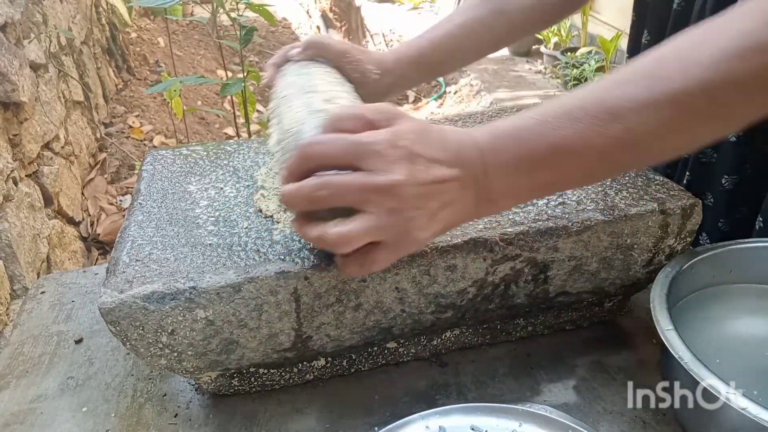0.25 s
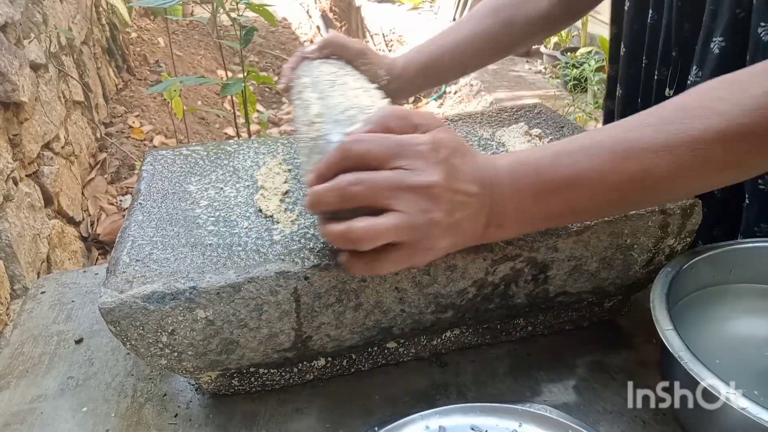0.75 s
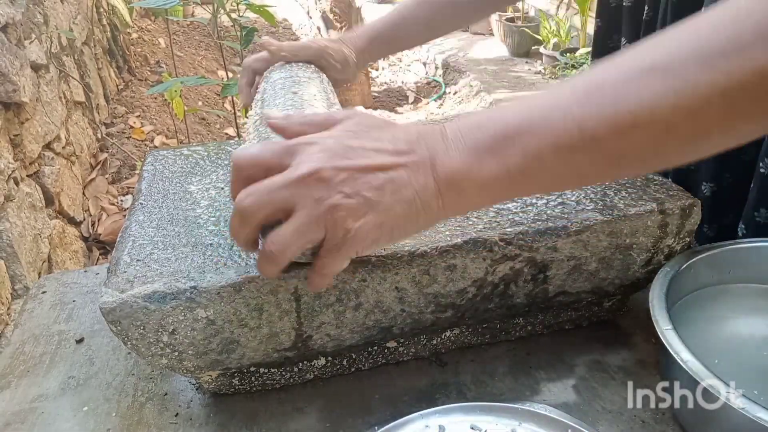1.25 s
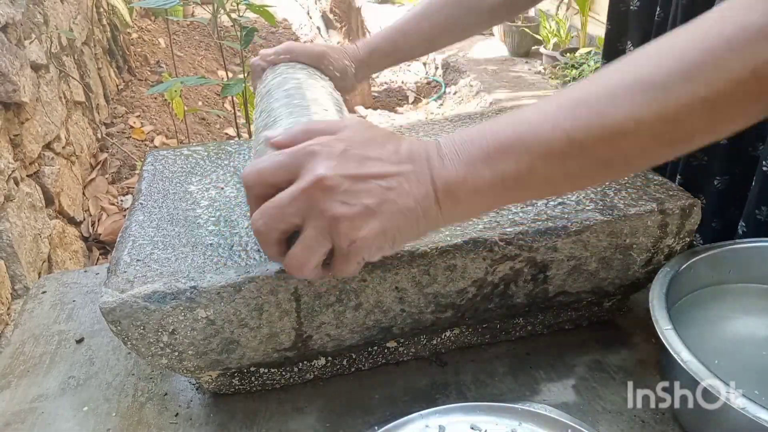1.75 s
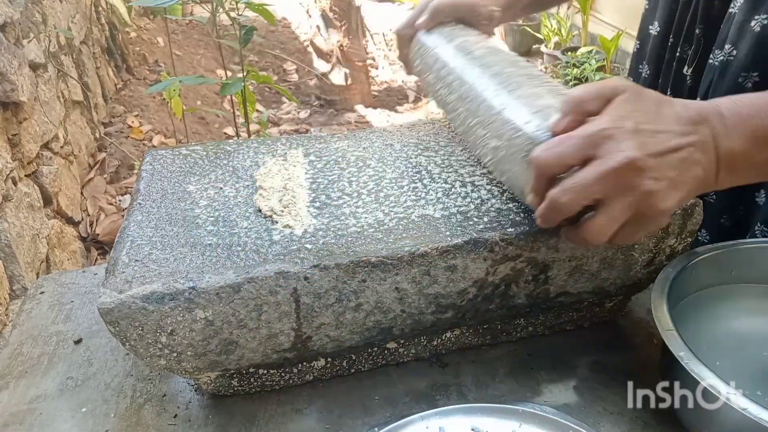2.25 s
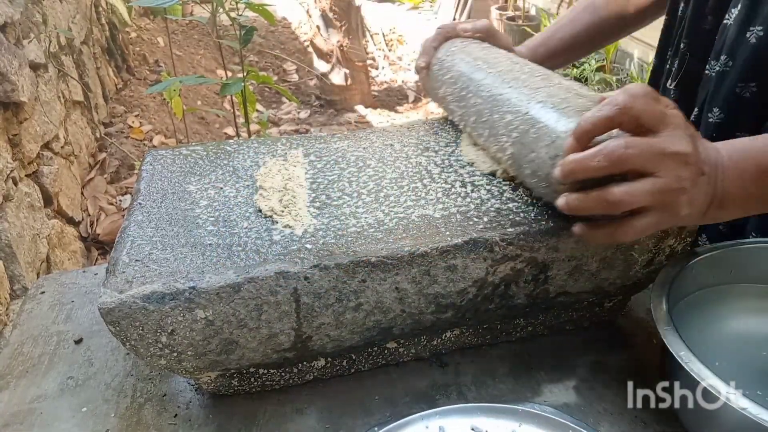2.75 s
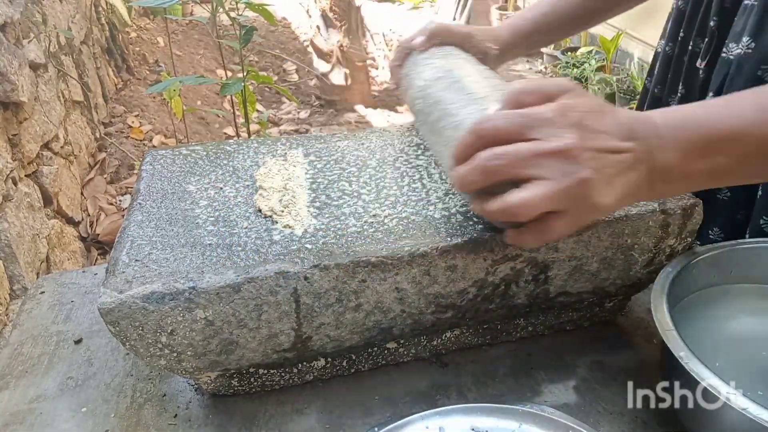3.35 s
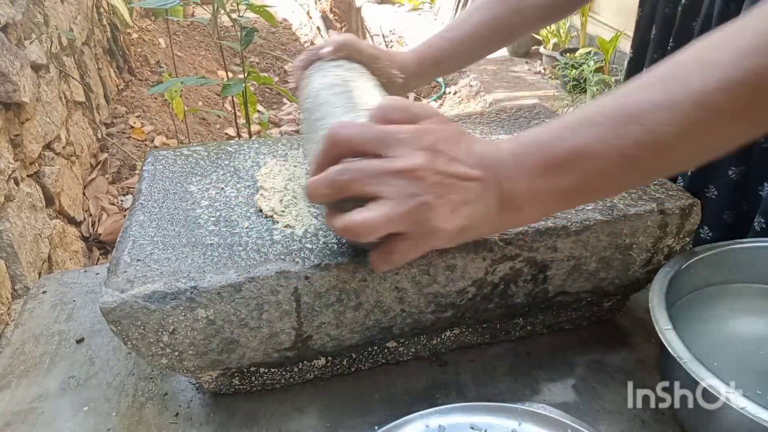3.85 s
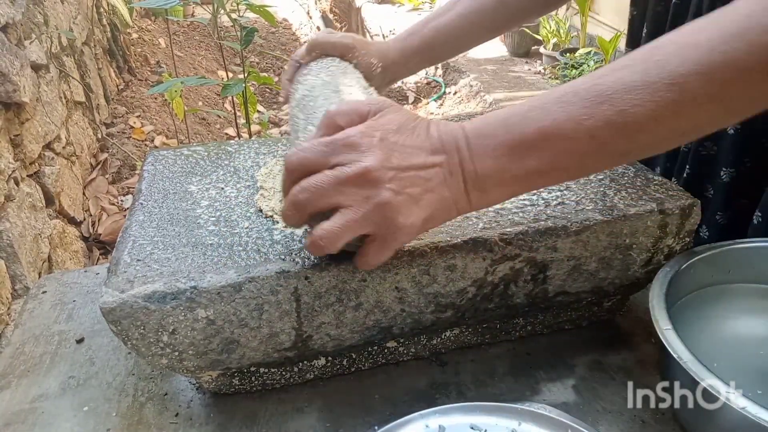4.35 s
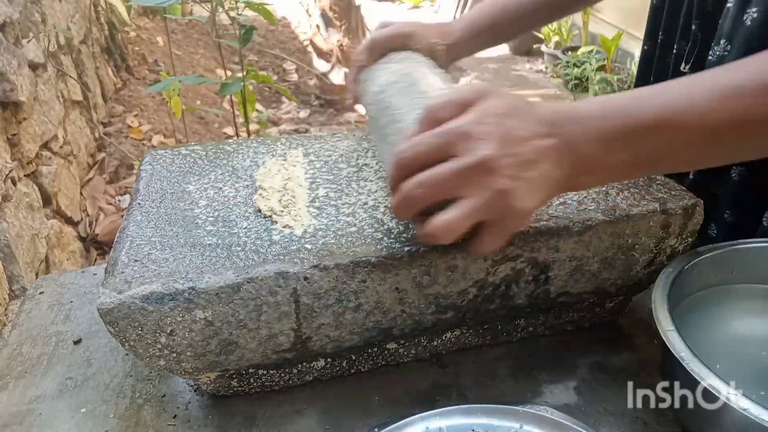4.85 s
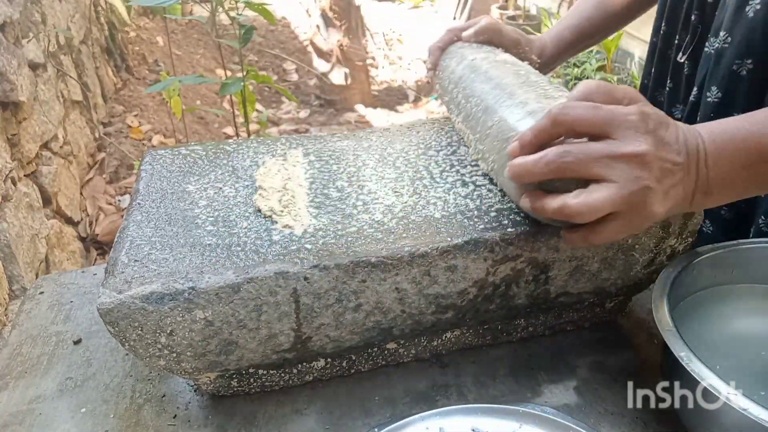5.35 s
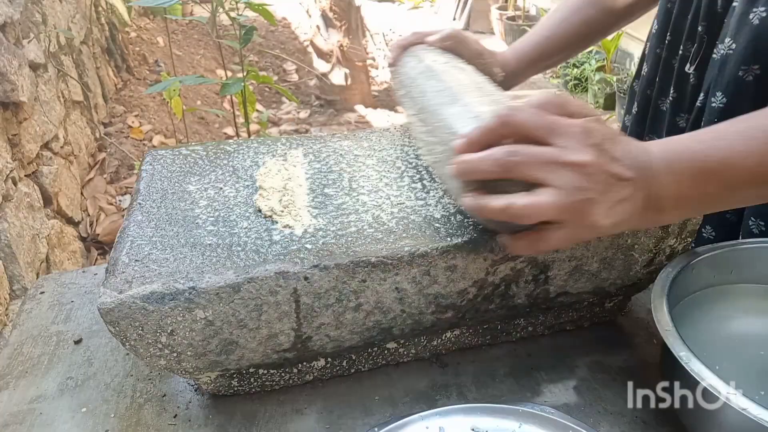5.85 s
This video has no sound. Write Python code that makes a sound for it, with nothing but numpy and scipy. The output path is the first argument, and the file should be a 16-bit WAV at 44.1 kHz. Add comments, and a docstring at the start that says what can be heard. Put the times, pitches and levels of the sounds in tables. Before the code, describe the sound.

Close by, stone grates on stone as a roller crushes paste on a slab in forceful, regular strokes, with a fine gritty crunch. Partway through, the roller clatters against the slab in several sharper knocks, then the grinding carries on. Behind it is a quiet outdoor wash of air, leaves and far traffic, with hoarse distant crows and high bird whistles that come more often in the second half.

```python
"""Gritty, thumping rumble of a granite roller pushed to and fro over a pitted slab, close by in a yard.
Every pit it rides over thumps the slab and rings the roller; grit and paste crackle, and now and then
stone knocks on stone. Far off among trees, small birds whistle in gliding tones and crows caw,
rough pulses through a resonant throat, over a low wash of air, leaves and traffic."""
import sys
import numpy as np
from scipy import signal
from scipy.fft import rfft, irfft, next_fast_len
from scipy.io import wavfile
from scipy.ndimage import map_coordinates

SR = 44100
rng = np.random.default_rng(int(sys.argv[2]) if len(sys.argv) > 2 else 0)


def log_audio(samples):
    """Write samples as a 16-bit WAV file to the path given in sys.argv[1]."""
    # one column per channel
    frames = np.atleast_2d(samples).T
    # limit to full scale, then quantise
    limited = np.clip(frames, -1, 1)
    pcm = np.round(limited * 32767).astype(np.int16)
    wavfile.write(sys.argv[1], SR, pcm)


N = 269010

# body of the slab: f/Hz, width/Hz, level/dB
SLAB_MODES = [(420, 81.3, 12.5), (545, 43, -8.5), (729.8, 29.4, -2), (958, 32, -3.5)]
# low end, the slab on its bed: f/Hz, width/Hz, level/dB
BED_MODES = [(103.8, 7.6, -12.5), (157.3, 52, -12.5), (262, 51.6, 5.5), (291.8, 68.3, 1.5)]
# bending ring of the roller: f/Hz, width/Hz, level/dB
ROLLER_MODES = [(2905, 4.4, -9.5), (2900, 11, 2.5), (3160, 450, -12.5), (3406, 33, 7)]
# its twin, the same bend across the other diameter: f/Hz, width/Hz, level/dB
TWIN_MODES = [(3595, 38, 0)]
# tone colour of the gritty crackle, with a bright microphone resonance near 9.4 kHz: f/Hz, level/dB
CRACKLE_EQ = [(1000, -14), (2000, -15.5), (2900, -8.5), (4000, -9), (5000, -21), (7000, -18), (8200, -14.5),
              (9400, -6), (11000, -17), (12500, -21.5), (15700, -24.5)]


def amp(db):
    """Gain of a level in dB."""
    return 10 ** (np.asarray(db) / 20)


def unit(x):
    """x at rms 1."""
    return x / np.sqrt(np.mean(x ** 2) + 1e-20)


def wobble(rate):
    """A smooth random curve, rate knots a second."""
    knots = rng.standard_normal(int(N * rate / SR) + 4)
    return map_coordinates(knots, [np.arange(N) * rate / SR])


def filtered(x, response):
    """x times a complex response of frequency."""
    size = next_fast_len(N + SR // 2)
    return irfft(rfft(x, size) * response(np.fft.rfftfreq(size, 1 / SR)), size)[..., :N]


def coloured(x, points):
    """x through an EQ curve of (f/Hz, level/dB) points on a log axis."""
    f, db = np.transpose(points)
    return filtered(x, lambda hz: amp(np.interp(np.log(hz + 1), np.log(f + 1), db)))


def ringing(x, modes, soft_hz):
    """x through resonances; a soft contact carries nothing much above soft_hz."""
    def response(f):
        body = sum((-1) ** k * amp(db) * 1j * f * width / (hz * hz - f * f + 1j * f * width)
                   for k, (hz, width, db) in enumerate(modes))
        return body / (1 + 1.4j * f / soft_hz - (f / soft_hz) ** 2) ** 2
    return filtered(x, response)


def bumps(rate, spread_db):
    """Random contacts, rate a second, most small and a few large."""
    chance, size, sign = rng.random((3, N))
    strength = amp(-spread_db * np.log(size + 0.0048))
    return unit((chance < rate / SR) * strength * np.sign(sign - .5))


def swells(start, rise, fall, db, swing=1, cut_db_per_s=575, rise_power=2.66, fall_power=1.88):
    """Envelope of events that swell, sag and cut off; swing scales the depth, powers square the shape."""
    t = np.arange(0, N / SR + .001, .001)
    start, rise, fall, db = (np.reshape(column, (-1, 1)) for column in (start, rise, fall, db))
    rise, fall = np.maximum(rise, .005), np.maximum(fall, .005)
    past_peak = t - start - rise
    sag = np.where(past_peak < 0, np.abs(past_peak / rise) ** rise_power,
                   np.abs(past_peak / fall) ** fall_power)
    outside_s = np.maximum(np.maximum(-past_peak - rise, past_peak - fall), 0)
    drop_db = swing * 19.5 * np.minimum(sag, 1) + cut_db_per_s * outside_s
    gain = np.sqrt(np.sum(amp(db - drop_db) ** 2, axis=0))
    return np.interp(np.arange(N) / SR, t, gain)


def yard():
    """Air, leaves and far traffic: a low, gently drifting wash of noise."""
    # tone colour of the ambience: f/Hz, level/dB
    spectrum = [(25, -10), (60, 6.5), (144, 11), (283, -3.5), (485, -8.5), (700, -1.5), (1030, -6.5),
                (2720, -3.5), (3470, -8.5), (4920, -16.5), (7580, -26.5), (9400, -46), (12500, -44.5),
                (16500, -62.5)]
    return unit(coloured(rng.standard_normal(N), spectrum)) * amp(-60 + 0.65 * wobble(1.7))


def whistle(call, rough_hz, octave_db):
    """One bird call: a gliding sine with a weak octave, the pitch shaken by rough_hz."""
    start, rise, fall, db, first_hz, last_hz = call
    hz = np.interp(np.arange(N) / SR, [start, start + rise + fall], [first_hz, last_hz])
    phase = 2 * np.pi * np.cumsum(hz + rough_hz * wobble(250)) / SR
    envelope = swells(start, rise, fall, db, swing=0.74, cut_db_per_s=900)
    flutter = amp(wobble(60))
    return np.sqrt(2) * envelope * flutter * (np.sin(phase) + amp(octave_db) * np.sin(2 * phase))


def birds():
    """Whistles, a wheeze and crows, set far back by the reverb of the trees."""
    # clear calls: start/s, rise/s, fall/s, level/dB before the reverb mix, first f/Hz, last f/Hz
    whistles = [(2.96, 0.17, 0.18, -57, 5010, 5020), (3.225, 0.059, 0.085, -48.5, 5255, 4900),
                (3.59, 0.024, 0.032, -50, 4400, 4890), (3.64, 0.015, .05, -44, 4790, 4830),
                (3.755, 0.019, 0.07, -50, 5110, 4900), (4.1, 0.036, 0.055, -47.5, 5160, 5130),
                (4.182, 0.12, .05, -49.5, 5100, 4840), (4.36, 0.046, 0.18, -59, 4880, 5080),
                (4.41, 0.026, 0.042, -48, 5100, 5100), (4.525, 0.027, .05, -51.5, 5254, 5290),
                (4.865, 0.025, 0.043, -49.5, 5040, 5030), (-.02, 0.017, .07, -54.5, 1783, 1350),
                (1.69, 0.035, 0.09, -56.5, 1348, 1390), (1.71, .03, 0.34, -61.5, 1143, 1123),
                (2.081, 0.25, 0.22, -61, 2010, 1633), (4.79, .035, 0.046, -58.5, 1390, 1354),
                (4.84, 0.041, .16, -52, 1148, 1142)]
    # one hoarse falling call: same columns
    wheeze = [(.565, .04, 0.26, -47, 4294, 3150)]
    calls = sum(whistle(call, rough_hz=48.1, octave_db=-11.5) for call in whistles)
    calls = calls + whistle(wheeze[0], rough_hz=190, octave_db=-31) + crows()
    t, trees_t60_s = np.arange(SR // 2) / SR, 0.52
    tail = rng.standard_normal(len(t)) * amp(-60 * t / trees_t60_s)
    wet = signal.fftconvolve(calls, tail / np.linalg.norm(tail))[:N]
    return amp(-10) * calls + amp(-1.5) * wet


def grit():
    """Sand and paste crunch in dense tiny cracks, with a sparse crackle of larger grains."""
    # the roller slides over grit: start/s, rise/s, fall/s, level/dB
    slides = [(0.028, 0.14, 0.074, -49.5), (0.334, 0.1, 0.097, -53.0), (0.633, 0.21, 0.083, -51),
              (1.117, 0.089, 0.032, -49), (1.428, 0.13, 0.13, -54.0), (1.784, 0.21, 0.14, -52),
              (2.095, 0.017, 0.26, -68), (2.738, 0.127, 0.14, -51), (3.047, 0.0073, 0.11, -56.5),
              (3.281, 0.11, 0.13, -48.0), (3.617, 0.11, 0.139, -49.0), (3.907, 0.19, 0.083, -50.5),
              (4.233, 0.099, 0.18, -49), (4.537, 0.13, 0.17, -49), (4.849, 0.21, 0.052, -47.5),
              (5.183, 0.096, 0.11, -50.0), (5.46, 0.21, 0.065, -48.5), (5.806, 0.08, 0.17, -49)]
    cracks = bumps(6000, spread_db=2.0)
    crunch = (cracks + .5 * rng.standard_normal(N)) * amp(2.62 * wobble(60))
    crackle = .55 * bumps(120, spread_db=2.5)
    sliding = swells(*np.transpose(slides), swing=0.46, cut_db_per_s=306.5,
                     rise_power=1.17, fall_power=1.17)
    resting = amp(-72)  # paste still crackles faintly between slides
    return unit(coloured(unit(crunch) + crackle, CRACKLE_EQ)) * (resting + sliding)


def grinding():
    """The roller rides over the pits of the slab: one train of bumps shakes slab, bed and roller."""
    # the roller bears down: start/s, rise/s, fall/s, slab level/dB, bed level/dB,
    # roller level/dB, twin level/dB, lag of the twin's peak behind the roller's/s
    strokes = [(0.032, 0.079, 0.13, -26.5, -34, -43, -48.0, -0.055),
               (0.315, 0.031, 0.11, -59, -48, -60.5, -71.5, 0.027),
               (0.387, 0.054, 0.11, -30.0, -30, -51.5, -46, 0.14),
               (0.655, 0.051, 0.26, -26.5, -35.5, -47.5, -46.0, -0.04),
               (0.724, 0.16, 0.045, -29.5, -32.5, -58, -51, 0.009),
               (1.103, 0.077, 0.063, -33.5, -27.0, -45, -39.5, -0.018),
               (1.468, 0.12, 0.059, -32.5, -31.5, -45, -44.5, 0.074),
               (1.922, 0.03, 0.15, -30.0, -31.0, -44, -52, 0.035),
               (2.062, 0.072, 0.073, -42, -36.5, -58.5, -66, -0.116),
               (2.209, 0.034, 0.15, -32.5, -32, -56, -75, -0.036),
               (2.343, 0.027, 0.16, -33.5, -33.5, -52, -58, 0.017),
               (2.586, 0.014, 0.087, -22.5, -23, -43, -57, -0.09),
               (2.611, 0.21, 0.039, -31.5, -40, -56.5, -58, -0.029),
               (2.909, 0.017, 0.16, -29, -35, -58, -63.0, 0.014),
               (3.04, 0.018, 0.12, -37, -40.5, -53.5, -67, -0.12),
               (3.28, 0.068, 0.07, -33, -31, -49.5, -44, -0.041),
               (3.655, 0.13, 0.08, -23.5, -32.0, -46, -43, 0.025),
               (3.973, 0.034, 0.068, -31, -29.5, -46.5, -49, 0.058),
               (4.038, 0.097, 0.052, -33.5, -39.5, -50.5, -54, 0.0048),
               (4.265, 0.14, 0.087, -25, -30, -46.5, -42, 0.043),
               (4.54, 0.12, 0.012, -54.5, -46.0, -56.0, -59, 0.013),
               (4.675, 0.034, 0.093, -33.0, -38.0, -48, -51.5, 0.007),
               (4.884, 0.056, 0.17, -22.5, -30.5, -44, -44.5, -0.075),
               (5.174, 0.018, 0.043, -50, -48, -51.5, -63.5, 0.002),
               (5.256, 0.059, 0.13, -33, -35, -53.5, -54, 0.12),
               (5.499, 0.083, 0.16, -26, -33.0, -47.5, -44.5, 0.089),
               (5.798, 0.012, 0.043, -50, -44, -49, -57, 0.02),
               (5.866, 0.039, 0.17, -34.5, -39, -57, -51, 0.19)]
    start, rise, fall, slab_db, bed_db, roller_db, twin_db, lag = np.transpose(strokes)
    pits = bumps(800, spread_db=2.2) * amp(1.7 * wobble(50))  # the grip judders
    chatter = pits + 0.72 * bumps(1200, spread_db=1.0)
    slab = unit(ringing(pits, SLAB_MODES, soft_hz=885)) * swells(start, rise, fall, slab_db)
    bed = unit(ringing(pits, BED_MODES, soft_hz=551)) * swells(start, rise, fall, bed_db, swing=0.67)

    def bend(modes, db, shift):
        envelope = swells(start, rise + shift, fall - shift, db, swing=0.63, cut_db_per_s=600)
        return unit(ringing(chatter, modes, soft_hz=4400)) * envelope
    # as the roller turns, the contact moves from the one bend to the other
    return slab + bed + bend(ROLLER_MODES, roller_db, -lag / 2) + bend(TWIN_MODES, twin_db, lag / 2)


def pushes(times, levels_db):
    """One spike of force for each touch of the stones."""
    knock_delay_s = 0.001455  # each knock sounds this long after its listed time
    force = np.zeros(N)
    force[np.round((times + knock_delay_s) * SR).astype(int)] = amp(levels_db)
    return force


def blows(times, peaks_db, modes, soft_hz):
    """Each push strikes the modes, which ring with the given peak level."""
    impulse_peak = np.abs(ringing(np.arange(N) == 0, modes, soft_hz)).max()
    return ringing(pushes(times, peaks_db), modes, soft_hz) / impulse_peak


def knocks():
    """Stone on stone: slab, bed and roller ring, and the faces grate as they settle."""
    # hits: t/s, slab peak/dB, then relative to it bed/dB, edge/dB (ahead of its trims), roller/dB
    hits = [(0.04, -23.5, -15, -15, -17), (0.102, -18.5, -17, -21, -32), (0.444, -20, -1.5, -15, -23),
            (0.675, -33, 6, -33, -26), (0.76, -26, 6.5, -19, -32), (1.575, -21.5, 4.5, -8, -22),
            (1.939, -26.5, -14, -3, -25), (2.239, -19.5, -9, -21, -25), (2.289, -23.5, -29, -21, -20),
            (2.367, -19, -8, -22, -13.5), (2.491, -21, 2, -17, -49), (2.586, -21, 4, -16, -26),
            (2.596, -5, -2.5, -8, -16.5), (2.607, -11.5, -28, -19, -30), (2.635, -4, -41, -7.5, -23.5),
            (2.665, -12.5, -5, -14, -38), (2.678, -13.5, -14, -19, -50), (2.732, -13, -30, -15, -44),
            (2.79, -27, -2, -30, -35), (2.918, -25, 1.5, -21, -23), (3.056, -9, -7, -11.5, -15.5),
            (3.096, -14.5, -4.5, -13, -15), (3.133, -34, 9, -11, -8), (3.813, -17, -6, -17, -34),
            (3.987, -34, 5.5, -8, 5), (4.344, -16.5, -8, -21, -31), (4.623, -38.5, 5.5, -20, -25),
            (4.917, -23, -4.5, -26, -38), (5.178, -40.5, 11, -25, -22), (5.271, -25.5, 5, -20, -5),
            (5.369, -16, -20.5, -9.5, -23), (5.802, -41, 7.5, -19, -28), (5.88, -27, 3, -23, -11)]
    # the hard edge, higher slab modes reached by hard contact: f/Hz, width/Hz, level/dB
    edge_modes = [(1042, 34, -4), (1100, 266, 2), (1300, 550, -3.5), (1873, 47, -7), (2170, 140, -10)]
    click_trim_db, grate_trim_db, grate_t60_s = -3, -13, 0.093
    times, db, bed_db, edge_db, roller_db = np.transpose(hits)
    decay = amp(-60 * np.arange(SR // 5) / SR / grate_t60_s)
    settling = signal.fftconvolve(pushes(times, db + edge_db + grate_trim_db), decay)[:N]
    grating = settling * unit(ringing(bumps(1500, spread_db=2.0), edge_modes, soft_hz=2300))
    knock = blows(times, db, SLAB_MODES, soft_hz=1570)
    thud = blows(times, db + bed_db, BED_MODES, soft_hz=600)
    click = blows(times, db + edge_db + click_trim_db, edge_modes, soft_hz=1950)
    ring = blows(times, db + roller_db, ROLLER_MODES + TWIN_MODES, soft_hz=4140)
    return knock + thud + grating + click + ring


def snaps():
    """Sticky paste and single grains part in short puffs of crackle."""
    # partings: t/s, level/dB before trim and EQ, send to the body resonance/dB
    partings = [(0.23, -38, 9), (0.345, -40.5, -26), (1.1686, -32.5, 0), (1.355, -42, -10.5),
                (1.4247, -54, 17.5), (1.573, -30, -17), (1.772, -31.5, -14), (1.832, -29, -14),
                (1.916, -29, -24), (2.519, -48, -19), (2.5969, -28.5, 4), (2.847, -33.5, 3),
                (3.053, -34, 0), (3.921, -35, 3), (4.2433, -46, -15), (4.5466, -38.5, 4.5),
                (4.802, -49, -23), (4.851, -41, -13), (5.0975, -49.5, 22.5), (5.1893, -29.5, 1),
                (5.626, -33, -14), (5.6967, -34, -27), (5.8135, -30.5, 2.5)]
    trim_db, attack_s, t60_s = -8.5, 0.0017, .075
    t = np.arange(SR // 10) / SR
    envelope = amp(-60 * t / t60_s) * (1 - np.exp(-t / attack_s))
    crisp, body = np.zeros((2, N + SR))
    for start, db, body_db in partings:
        lumps = amp(5 * rng.standard_normal(len(t) // 40 + 1)).repeat(40)[:len(t)]
        puff = amp(db + trim_db) * unit(envelope * rng.standard_normal(len(t)) * lumps)
        crisp[round(start * SR):][:len(t)] += puff
        body[round(start * SR):][:len(t)] += puff * amp(body_db)
    return coloured(crisp[:N], CRACKLE_EQ) + ringing(body[:N], [(3380, 600, 0.0091)], soft_hz=6020)


def crows():
    """Hoarse drooping caws: unsteady pulses and breathy noise through the throat."""
    # caws: start/s, rise/s, fall/s, level/dB before the reverb mix
    caws = [(0.741, 0.083, 0.37, -53.5), (1.33, .04, 0.13, -54.5), (1.47, 0.069, 0.16, -61),
            (1.829, 0.037, .5, -56), (2.9, .25, .4, -75), (4.225, 0.061, 0.3, -46.5),
            (4.529, 0.088, 0.32, -54), (4.99, 0.067, 0.15, -53), (5.199, 0.086, 0.1, -59),
            (5.749, 0.19, 0.23, -66.5)]
    # formants of the throat: f/Hz, width/Hz, level/dB
    throat = [(1629, 312, 1), (1856, 925, 1), (2457, 1220, -4.5)]
    pitch_hz, droop_per_s = 512.5, .12
    t, starts = np.arange(N) / SR, np.transpose(caws)[0]
    latest_start = starts[np.maximum(np.searchsorted(starts, t) - 1, 0)]
    age = np.clip(t - latest_start, 0, 1)
    hz = pitch_hz * (1 - droop_per_s * age + 0.032 * wobble(6) + .03 * wobble(200))
    cycles = np.cumsum(hz) / SR
    pulses = np.diff(np.floor(cycles), prepend=0) * amp(1.6 * wobble(300))
    rasp = unit(pulses - pulses.mean()) + 0.47 * rng.standard_normal(N)
    voice = ringing(ringing(rasp, throat, soft_hz=3430), throat, soft_hz=3430)
    hoarse = amp(2.5 * wobble(22))
    return unit(voice) * hoarse * swells(*np.transpose(caws), swing=0.59, cut_db_per_s=123)


def scene():
    """Mono mix: stonework up close, birds and yard behind."""
    return (grinding() + grit() + knocks() + snaps() + birds() + yard())[None]


def record(dry):
    """The phone microphone is deaf to deep bass and keeps nothing above its band limit."""
    low_cut_hz, top_hz = 60, 15830
    return filtered(dry, lambda hz: (1j * hz / (1j * hz + low_cut_hz)) ** 2 * (hz < top_hz))


dry = scene()
out = record(dry)
log_audio(out)
```